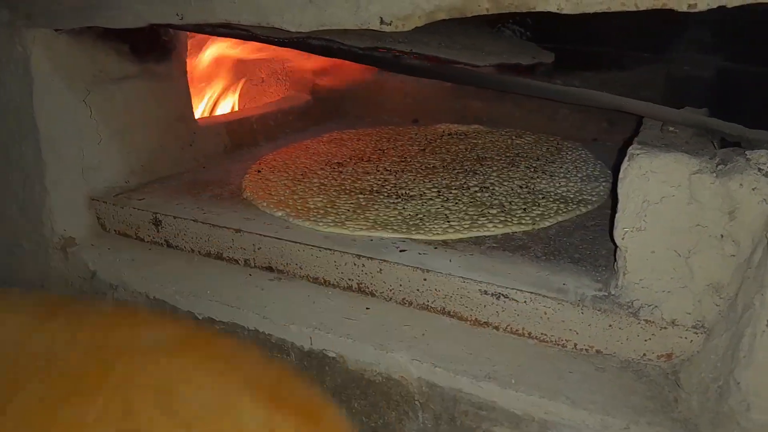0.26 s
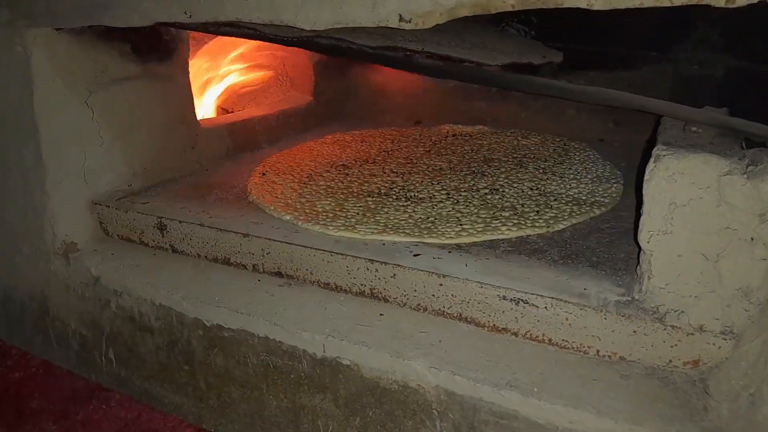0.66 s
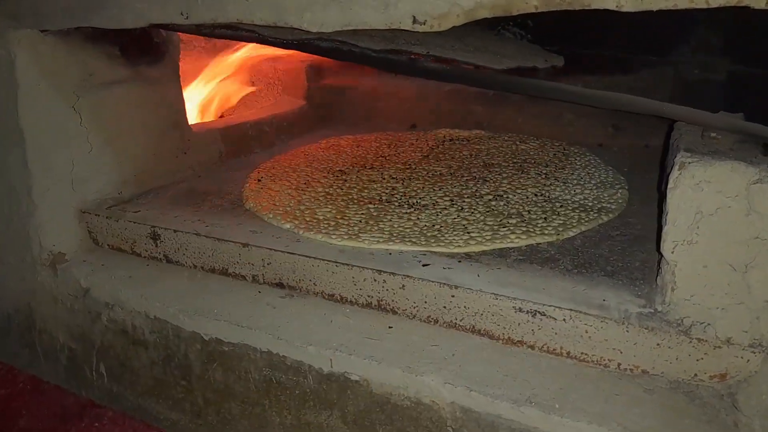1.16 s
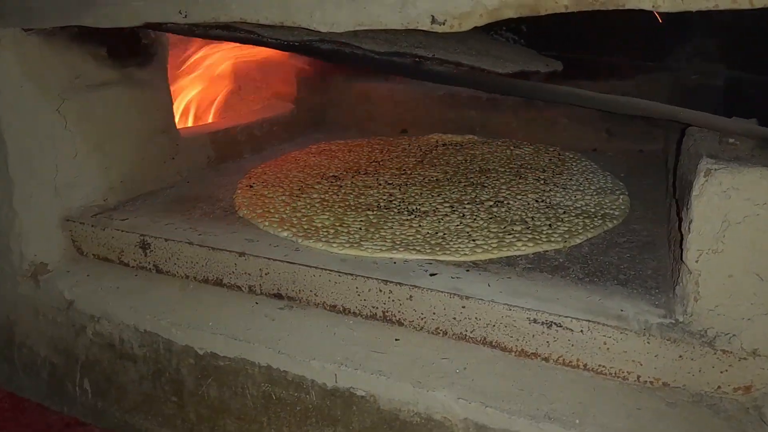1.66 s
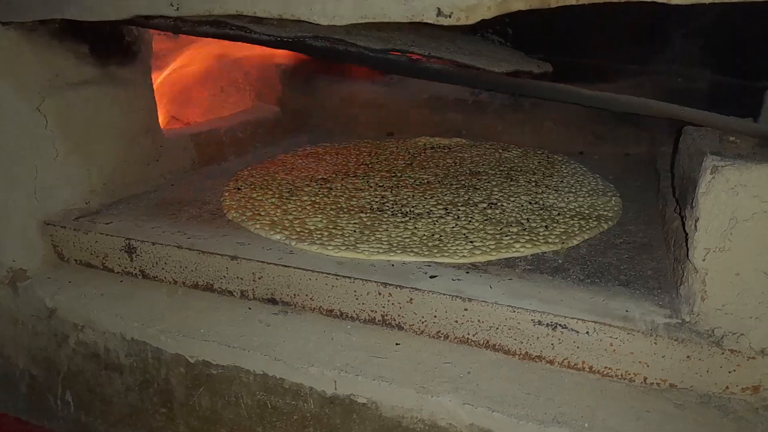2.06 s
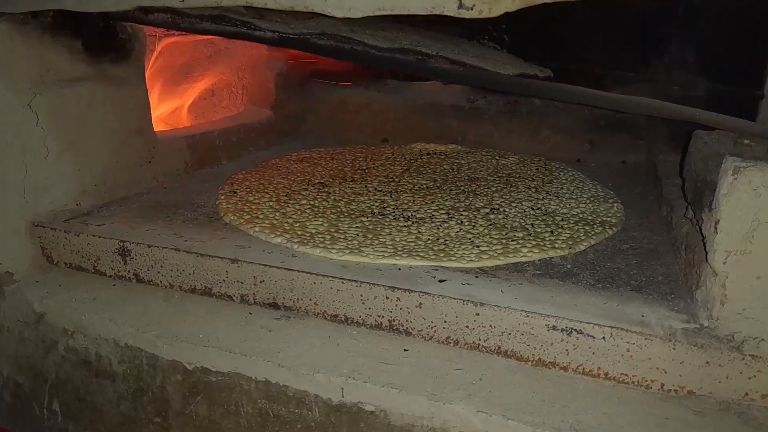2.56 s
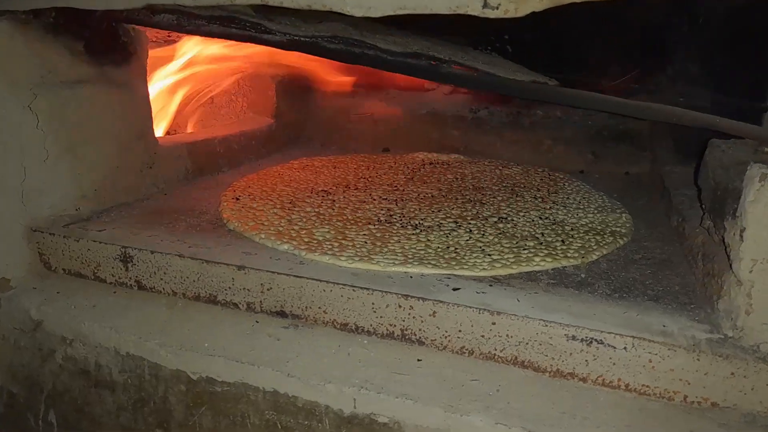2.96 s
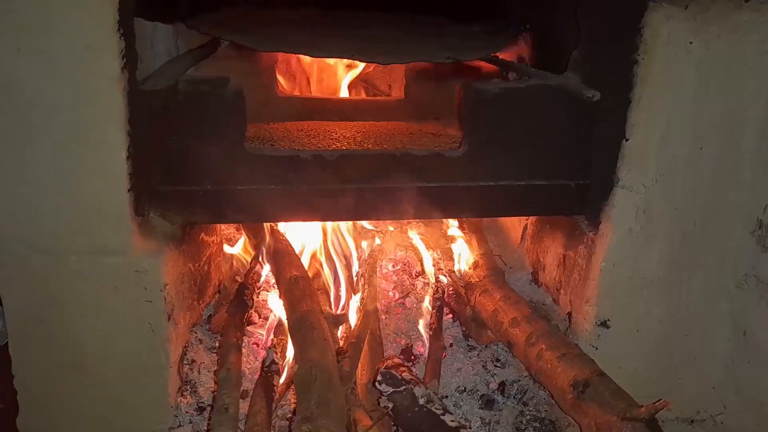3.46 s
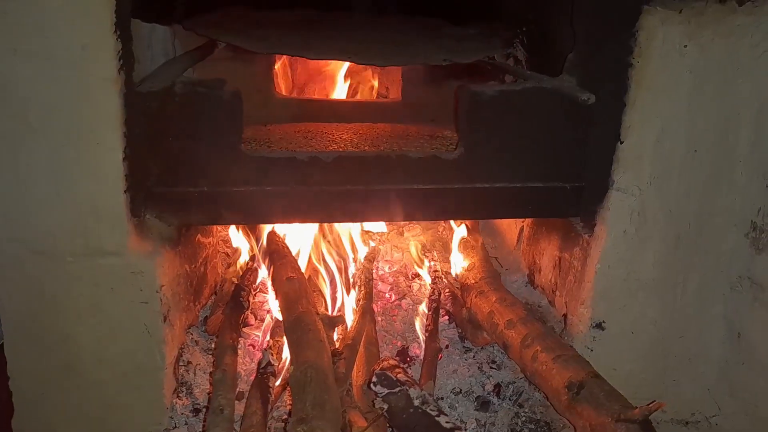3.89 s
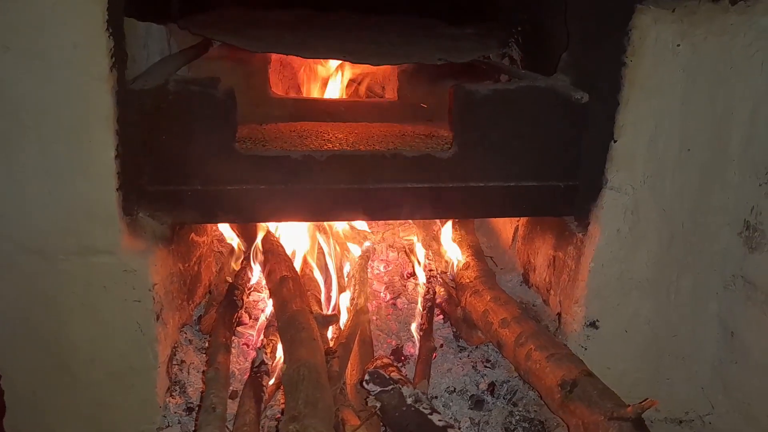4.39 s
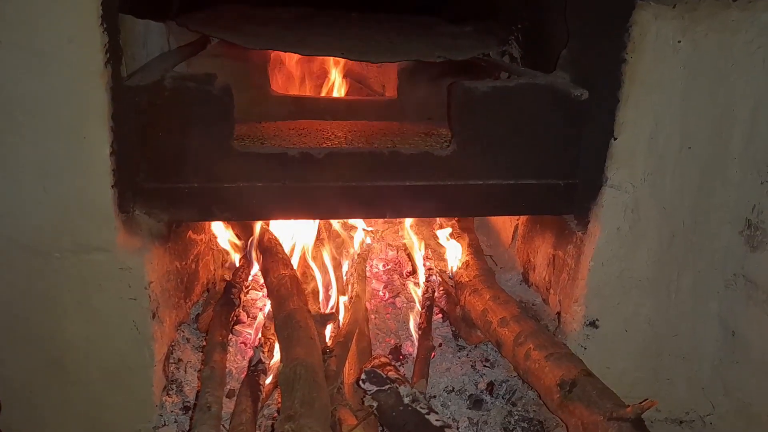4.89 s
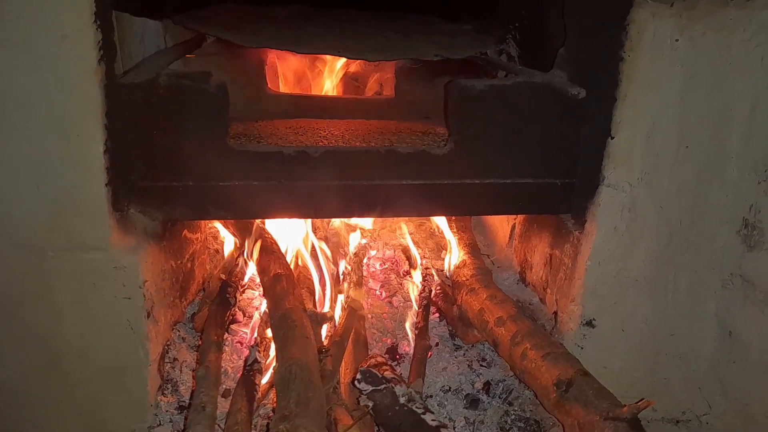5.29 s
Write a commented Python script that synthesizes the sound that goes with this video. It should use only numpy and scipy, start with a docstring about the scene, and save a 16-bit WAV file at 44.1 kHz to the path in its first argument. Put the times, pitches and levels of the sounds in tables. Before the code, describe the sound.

A wooden peel rasps briefly off a stone oven floor, knocks and bounces to rest, then a crackling wood fire comes closer.

```python
"""A rasping drag over stone is heard first: a wooden peel leaves an oven floor by stick-slip friction.
It is set down on its edge and its handle bounces to rest (decaying modes), amid scuffs, creaks and thuds.
Beneath, a wood fire hums, fizzes and spits (coloured noise and short bursts), with a low rumble of handling.
At 3.46 s the scene cuts to a nearer view of the fire: hum and fizz jump up, and a log knocks (decaying noise)."""
import sys
import numpy as np
from scipy import signal
from scipy.fft import rfft, irfft, next_fast_len
from scipy.io import wavfile
from scipy.ndimage import uniform_filter1d, map_coordinates

SR = 44100
rng = np.random.default_rng(int(sys.argv[2]) if len(sys.argv) > 2 else 0)


def dump(signal):
    """Clip the signal to [-1, 1] and save it as 16-bit WAV at the path in sys.argv[1]."""
    limited = np.clip(np.atleast_2d(signal).T, -1, 1)
    pcm = np.round(limited * 32767).astype(np.int16)
    wavfile.write(sys.argv[1], SR, pcm)


N = 244314

# The drag of the blade: time_s, rasp_level_db
PULL_LEVELS = [(0, -36.5), (.008, -26), (.024, -39), (.048, -32.5), (.072, -42.5), (.086, -34.5),
               (.106, -41.5), (.12, -56.5), (.22, -85.5)]
# Colour of the blade rasping on the oven floor: frequency_hz, level_db (relative, per Hz)
STONE_COLOUR = [(600, -35), (1600, -11), (2300, -4), (3200, -4.5), (4700, -3.5), (7000, -12),
                (12000, -28.5)]
# Colour of grit under wood: frequency_hz, level_db (relative, per Hz)
GRIT_COLOUR = [(2500, -22.5), (5000, -12), (6300, -11), (8000, -2), (10000, 3.5), (14000, -1), (16000, -2)]
# Resonances of the rubbed blade: centre_hz, width_hz, level_db
BLADE_MODES = [(312, 36, -11.5), (479, 19, 0.5), (677, 20, -2.5), (985, 33, -9), (1122, 40, -9.5),
               (1380, 50, -15), (1520, 41, -12), (2180, 150, -15)]
# Lowest bending modes of the blade: centre_hz, width_hz, level_db
BENDING_MODES = [(144.4, 22, -2.5), (201, 26, 0.2)]
# Shaking of the blade: start_level_db, dragged_fade_db_per_s, free_fade_db_per_s
BLADE_SWAY = (-24.5, 159, 415)
# Shaking of its lowest bending modes: start_level_db, dragged_fade_db_per_s, free_fade_db_per_s
BENDING_SWAY = (-22.5, 110, 288)
# Left-right likeness of a source close by: frequency_hz, left_right_correlation
NEAR_LIKENESS = [(100, 0.94), (600, 0.99), (2000, 0.2), (8000, 0.2)]
PULL_GRIT_DB = -9  # grit relative to the rasp


def pull():
    """Sliding friction: rough stone and grit radiate noise and excite the blade's modes."""
    rasp, = gains(PULL_LEVELS)
    grit_noise = rush(shape(GRIT_COLOUR), NEAR_LIKENESS, 1.7, 300, 0.00013)
    stone_noise = rush(shape(STONE_COLOUR), NEAR_LIKENESS, 2.3, 250, .00027)
    blade_noise = rush(ringing(BLADE_MODES), NEAR_LIKENESS, 2.4, 90, 0.00019)
    bending_noise = rush(ringing(BENDING_MODES), NEAR_LIKENESS, 2.8, 40)
    return (rasp * amp(PULL_GRIT_DB) * grit_noise * amp([[1.5], [-1.5]])
            + rasp * stone_noise * amp([[1.8], [-1.8]])
            + sway(*BLADE_SWAY) * blade_noise * amp([[-1.3], [1.3]])
            + sway(*BENDING_SWAY) * bending_noise)


LIFT_S = .112  # the blade leaves the stone


def sway(start_db, dragged, free):
    """Damped vibration: the level falls at one rate in contact, faster once the blade is free."""
    t = np.arange(N) / SR
    return amp(start_db - dragged * np.minimum(t, LIFT_S) - free * np.maximum(t - LIFT_S, 0))


# Catches of the blade on the stone: start_s, level_db (relative)
SLIP_EVENTS = [(0.005, -16), (0.011, -14), (0.035, -21), (0.045, -23), (0.057, -24), (0.087, -28.5),
               (0.122, -47)]


def slips():
    """Stick-slip: each catch releases a noise jolt that rings the blade and sprays grit."""
    jolts, t = np.zeros(N), np.arange(SR // 50) / SR
    for s, db in SLIP_EVENTS:
        jolts[round(s * SR):][:len(t)] += amp(db - 60 * t / .012) * rng.standard_normal(len(t))
    blade = amp(15.5) * filtered(jolts, ringing(BLADE_MODES))
    spray = amp(-5.0) * filtered(jolts, ringing([(4600, 2300, -5), (9800, 2000, -11)]))
    sound = blade + spray
    return np.array([sound, amp(-3) * np.roll(sound, 11)])  # later and weaker on the right


# The peel's edge touching down: start_s, level_db (relative)
SET_DOWN_BLOWS = [(.444, -50.5), (.729, -19), (.845, -49), (.918, -52)]
# Modes of the blade standing on its edge: pitch_hz, level_db, t60_s
EDGE_MODES = [(63, -9, 0.3), (105.4, -7, 0.2), (148.9, 5.5, 0.14), (203, -14.5, 0.21), (236.5, -12.5, 0.3),
              (327, -4, 0.076), (483, -9.5, 0.15), (606, -26.5, 0.13), (783, -27, 0.067)]
# The handle bouncing: start_s, level_db (relative)
BOUNCE_BLOWS = [(1.139, -23.5), (1.281, -28), (1.407, -30.5), (1.525, -42)]
# Modes of the handle: pitch_hz, level_db, t60_s
HANDLE_MODES = [(57.8, -22, 0.35), (153, -4, 0.33), (204.3, 4, 0.1), (240, -5, 0.13), (383, -11.5, 0.073),
                (513, -5.5, 0.042), (625, -9, 0.079), (700, -23.5, 0.12), (805, -14, 0.075)]
# Soft thuds: start_s, level_db (relative)
THUD_BLOWS = [(1.888, -43), (1.976, -53.5), (2.561, -52.5), (3.058, -47.5)]
# Modes of a soft, heavy contact: pitch_hz, level_db, t60_s
THUD_MODES = [(72.2, -4, 0.33), (111.5, 5.5, 0.14), (149.4, 0.5, 0.48)]


def peel_blows():
    """Impact excitation: edge, handle and soft contacts each ring their own modes."""
    return (knocks(SET_DOWN_BLOWS, EDGE_MODES, 0.0097, -1.2, .028, -8.0)
            + knocks(BOUNCE_BLOWS, HANDLE_MODES, 0.0046, -3.6, .023, -11.0)
            + knocks(THUD_BLOWS, THUD_MODES, 0.0038, -0.32, 0.0304, -5))


def knocks(events, modes, attack_s, trim_db, rebound_s, rebound_db):
    """Modal superposition: a soft blow rings decaying sines, and the body touches once more as it rocks."""
    out, t = np.zeros(N + SR), np.arange(SR // 2) / SR
    for s, db in events:
        for late, loss_db in (0, 0), (rebound_s, rebound_db):
            ring = 0
            for hz, level, t60 in modes:
                mode_db = level + rng.normal(0, 0.87)  # each blow excites the modes unevenly
                ring = ring + amp(mode_db - 60 * t / t60) * np.sin(2 * np.pi * hz * t)
            attack = 1 - np.exp(-t / attack_s)
            out[round((s + late) * SR):][:len(t)] += amp(db + trim_db + loss_db) * ring * attack
    return out[:N]


# Scuffs nearby: start_s (of full strength), rise_s, hold_s, fall_s, rasp_level_db (relative),
# grit_over_rasp_db, wood_over_rasp_db
SCUFF_STROKES = [(0.464, 0.21, 0.061, 0.6, -72.5, 5.5, -6.5), (.737, 0.036, 0.18, 0.1, -65, -0.5, 3),
                 (0.952, 0.0077, 0.0075, 0.077, -72.5, 19.5, -30),
                 (1.034, 0.16, 0.027, 0.045, -58.5, 1.5, 0.5), (1.083, 0.014, 0.015, 0.13, -52, 1, 0.5),
                 (1.373, 0.24, 0.035, 0.16, -73.5, 12, -14.5), (1.478, .006, 0.0056, 0.062, -59.5, 0, 4),
                 (1.584, 0.19, 0.011, 0.26, -63, 5.5, -13), (1.681, .006, .01, 0.21, -73, 14.5, -0.5),
                 (1.816, 0.0044, 0.0045, 0.028, -61.5, 12.5, 10.5),
                 (1.851, 0.034, 0.038, 0.09, -46, 2, 3.5), (1.998, 0.015, 0.011, 0.36, -80.5, 14, -20),
                 (2.207, .05, 0.0093, .05, -81.5, 15.5, -2), (2.397, 0.3, .03, 0.27, -78, 7.5, -9.5),
                 (2.553, 0.083, 0.011, 0.34, -69.5, 3.5, -13.5), (2.753, 0.037, 0.033, 0.2, -71, 6, -10.5),
                 (2.997, 0.13, 0.014, 0.067, -76, 16.5, -21.5),
                 (3.076, 0.094, 0.089, 0.042, -63.5, 0, -11.5), (3.162, .005, 0.007, 0.078, -55, -13, 3.5),
                 (3.189, .03, .01, 0.093, -67.5, -11, 8), (3.296, 0.21, 0.15, .1, -76, 8, -16.5)]
# Short hollow tones: centre_s, length_s, pitch_hz, level_db (relative)
CREAK_TONES = [(0.474, 0.044, 493, -79), (0.542, 0.062, 600, -66), (0.856, 0.071, 480.5, -57),
               (1.665, 0.018, 880, -63.5), (1.857, 0.062, 918, -48.5), (2.403, 0.052, 2676, -79.5),
               (2.538, 0.027, 2580, -74), (3.117, 0.12, 1389, -74)]
# Colour of the scuffs' rasp: frequency_hz, level_db (relative, per Hz)
RASP_COLOUR = [(600, -27), (1300, -14.5), (2000, -2), (3200, -3), (4700, -3.5), (6500, -5), (12000, -34)]
# Colour of the scuffs' wood: frequency_hz, level_db (relative, per Hz)
WOOD_COLOUR = [(150, -10), (400, -6), (650, -8), (950, -7.5), (1300, -11.5), (1950, -13.5), (2800, -30)]
SCUFF_FADE_DB = 26  # how far a scuff is down one rise before and one fall after
SCUFF_PAN_DB = -5  # left over right


def scuffs():
    """Rubbing friction: wood brushes over stone and ash to the right, creaking as short tones."""
    t = np.arange(N) / SR
    rasp, grit, wood, creaks = 0, 0, 0, 0
    for s, rise, hold, fall, db, grit_db, wood_db in SCUFF_STROKES:
        away = np.maximum(np.maximum((s - t) / rise, (t - s - hold) / fall), 0)
        stroke = amp(db - SCUFF_FADE_DB * away)
        rasp = rasp + stroke
        grit = grit + amp(grit_db) * stroke
        wood = wood + amp(wood_db) * stroke
    waver = 0.00013 * wobble(70)  # seconds, unsteadies the pitch
    for s, length, hz, db in CREAK_TONES:
        swell = np.exp(-8 * ((t - s) / length) ** 2)
        creaks = creaks + amp(db) * swell * np.sin(2 * np.pi * hz * (t + waver))
    pan = amp(np.array([[.5], [-.5]]) * SCUFF_PAN_DB)
    return pan * (grit * rush(shape(GRIT_COLOUR), NEAR_LIKENESS, 1.1, 550, -.0003)
                  + rasp * rush(shape(RASP_COLOUR), NEAR_LIKENESS, 1.5, 300, -.0003)
                  + wood * rush(shape(WOOD_COLOUR), NEAR_LIKENESS, 2.64, 120, -0.0003)
                  + creaks * amp(2.1 * wobble(71)))


# A log knocks and settles: start_s, level_db (relative)
LOG_KNOCKS = [(3.786, -27), (3.809, -40.5)]
# Colour of the knock: frequency_hz, level_db (relative, per Hz)
LOG_COLOUR = [(100, -5.5), (150, 6), (390, -21.5), (480, -1), (560, 3), (650, -2), (800, 4.5), (1070, 1.5),
              (1350, 2), (1500, -23.5), (2100, -2), (3000, -11.5), (3300, -27.5), (5500, -32), (8000, -43)]
# Decay of the knock: frequency_hz, t60_s
LOG_DECAY_TIMES = [(200, 0.24), (800, .2), (2500, 0.15), (6000, 0.27)]


def log():
    """Scattering: a dry knock becomes wall-diffused noise whose decay time depends on frequency."""
    out, length = np.zeros((2, N + SR)), SR // 2
    for s, db in LOG_KNOCKS:
        noise = rng.standard_normal(length) + .5 * rng.standard_normal((2, length))
        hz, t, z = signal.stft(noise, SR, nperseg=256)
        z = z * amp(along(LOG_COLOUR, hz)[:, None] - 60 * t / along(LOG_DECAY_TIMES, hz)[:, None])
        tail = signal.istft(z, SR, nperseg=256)[1][:, :length]
        tail[0] = np.roll(tail[0], 11)  # later on the left
        out[:, round(s * SR):][:, :length] += amp(db - 8.5) * tail / np.std(tail[:, :600])
    return out[:, :N] * amp([[-1.5], [1.5]])


# Loud cracks of sap and grit: start_s, level_db (relative), pitch_hz (of the band), left_over_right_db
LOUD_SPITS = [(0.2304, -52.5, 11400, -6), (0.3296, -50, 13600, -6), (0.374, -49.5, 13000, -3.5),
              (0.4504, -51.5, 12400, -5.5), (0.6649, -46.5, 12600, -13.5), (0.8759, -43, 14260, 2.0),
              (0.9569, -42, 9930, 3.5), (1.0804, -43, 4330, -2), (1.254, -51, 11200, -6.5),
              (1.476, -42.5, 10050, -18), (1.6871, -41, 10000, -10), (1.8123, -42.5, 6100, -17),
              (1.8424, -42, 14000, -5), (1.8507, -32.5, 10900, -7.5), (1.8602, -29, 13600, -4),
              (1.8674, -32.5, 10400, -5), (1.8784, -36, 6100, -4.5), (1.9144, -34.5, 9600, -4.5),
              (1.9994, -46.5, 11600, -10), (2.1994, -54.5, 7770, -6.0), (2.36, -55, 9230, -4.5),
              (2.4017, -56.5, 9330, -0.5), (2.4843, -45.5, 13700, 3), (2.5551, -46.5, 12800, 0.5),
              (2.7741, -48, 11500, -0.5), (2.7854, -43, 13200, 2.5), (2.7965, -37, 12900, 5.5),
              (2.9442, -49, 10200, -12.5), (3.1612, -43, 9900, -8), (3.4346, -45, 11000, -3),
              (3.5174, -43.5, 12300, 6.5), (3.5528, -47, 12900, 1.5), (3.5828, -40.5, 14000, 7.5),
              (4.1629, -39.5, 11400, 5), (4.2517, -43, 13800, 1), (4.3166, -36, 9630, 11),
              (4.369, -48, 12400, 5), (4.5521, -44, 6520, 11), (4.6423, -43.5, 9880, 11),
              (4.783, -40.5, 11300, 10), (4.8574, -37.5, 13900, 11), (4.9247, -37, 13300, 6),
              (5.0988, -41, 13800, 10), (5.1133, -41, 12260, 10), (5.1721, -42.5, 13400, 3.5),
              (5.3507, -44, 12400, 3.0), (5.3986, -45, 12300, 6), (5.4974, -39, 12200, 13)]
TICK_DB = -10.5  # gain of the broad click under each spit


def spits():
    """Impulsive release: sap and grit burst in a bright crack, a wall echo and a puff of steam."""
    out, t = np.zeros((2, N + SR)), np.arange(SR // 10) / SR
    crack = amp(-60 * t / .008)
    echo = np.roll(crack, round(.007 * SR))
    envelope = crack + amp(-11.0) * echo + amp(-14.5 - 60 * t / 0.05)
    for s, db, hz, pan_db in [*LOUD_SPITS, *small_spits()]:
        band = [hz / 1.45, min(hz * 1.25, 15200)]
        sos = signal.butter(2, band, "bandpass", fs=SR, output="sos")
        noise = rng.standard_normal(len(t)) + 0.23 * rng.standard_normal((2, len(t)))
        burst = signal.sosfilt(sos, noise * envelope)
        tick = np.diff(rng.standard_normal(len(t)) * crack ** 2, 2, prepend=[0, 0])
        burst = burst + amp(TICK_DB) * tick
        strength = np.sqrt(2) * np.std(burst.mean(0)[:SR // 500]) * 2  # from the first 2 ms
        pan = np.array([[.5], [-.5]]) * pan_db
        out[:, round(s * SR):][:, :len(t)] += amp(db + pan) * burst / strength
    return out[:, :N]


# The fire, jumping up at the cut to a nearer view: time_s, low_rumble_level_db (flames' hum, with rumble
# of handling from about 0.8 to 1.9 s), fizz_level_db (both relative)
FIRE_LEVELS = [(0, -53.5, -65), (.25, -64.5, -65.5), (.7, -69.5, -72), (.9, -58, -63), (1.37, -57.5, -73.5),
               (1.6, -59.5, -72.5), (1.84, -63, -69.5), (2.02, -65.5, -74.5), (2.82, -68.5, -74.5),
               (2.999, -69, -70.5), (3.456, -65.5, -76.5), (3.47, -60, -61), (4.65, -60, -61.5),
               (5.0, -56.5, -62), (5.55, -57, -61.5)]
SMALL_SPITS = 30
SMALL_DB, SMALL_SPREAD_DB, SMALL_HZ = 8, 2, 11500  # over the fizz, scatter, middle pitch


def small_spits():
    """Random point process: faint spits at chance moments, their level following the fizz."""
    s, _, fizz_db = np.transpose(FIRE_LEVELS)
    when, draw = rng.uniform(0, N / SR, SMALL_SPITS), rng.standard_normal((SMALL_SPITS, 3))
    db = np.interp(when, s, fizz_db) + SMALL_DB + SMALL_SPREAD_DB * draw[:, 0]
    hz = np.clip(SMALL_HZ * np.exp(.2 * draw[:, 1]), 5000, 14500)
    return np.transpose([when, db, hz, 6 * draw[:, 2]])


# Colour of the low rumble: frequency_hz, level_db (relative, per Hz)
RUMBLE_COLOUR = [(15, -40.5), (25, -17.5), (60, -1.5), (82, -8), (142, 0.5), (225, -14), (300, -13),
                 (417, -32), (505, -28), (624, -37), (1050, -39), (2500, -51), (3250, -80.5), (5500, -120)]
# Colour of the fizzing sap: frequency_hz, level_db (relative, per Hz)
FIZZ_COLOUR = [(2500, -44), (7000, -9.5), (8300, -17.5), (9800, -1), (13900, -2), (15800, -11.5)]
# Colour of the hiss: frequency_hz, level_db (relative, per Hz)
HISS_COLOUR = [(800, -13.5), (2300, -13.5), (4000, -6.5), (6000, 0.5), (7200, -6), (8500, -15),
               (12000, -33.5)]
# Likeness of diffuse sound: frequency_hz, left_right_correlation
DIFFUSE_LIKENESS = [(60, 1), (130, 0.91), (290, 0.28), (640, 0.25), (1400, 0.033), (6000, 0.013)]
HISS_DB = -8.5  # gain of the hiss against the fizz table


def fire():
    """Turbulent noise: flames hum low, joined by rumble of handling, and sap fizzes in fine crackle."""
    rumble, fizz = gains(FIRE_LEVELS)
    flicker = wobble(3.5)
    rumble_noise = rush(shape(RUMBLE_COLOUR), DIFFUSE_LIKENESS, 1.1, 40, patchy_db=0.9)
    fizz_noise = rush(shape(FIZZ_COLOUR), DIFFUSE_LIKENESS, 1.8, 510, patchy_db=0.7)
    hiss_noise = rush(shape(HISS_COLOUR), DIFFUSE_LIKENESS, .8, 400, patchy_db=0.36)
    return (rumble * amp(2.0 + 0.77 * wobble(3.8)) * rumble_noise * amp([[-.8], [.8]])
            + fizz * amp(1.5 + 0.31 * flicker) * fizz_noise
            + fizz * amp(HISS_DB + 0.16 * flicker) * hiss_noise)


ROOM_DB = -13


def room(x):
    """Reverberation: convolution with exponentially decaying noise gives the walls' short answer."""
    t = np.arange(SR // 3) / SR
    tail = rng.standard_normal((2, len(t))) * amp(-60 * t / 0.17)
    return signal.fftconvolve(x[None], tail / np.linalg.norm(tail[0]), axes=1)[:, :N]


def rush(colour, alike, grain_db, rate, lead_s=0., patchy_db=2.24):
    """Partly coherent stereo noise: rms 1, patchy and grainy; the left port hears it lead_s early."""
    z = signal.stft(rng.standard_normal((2, N)), nperseg=256)[2]
    field = uniform_filter1d(uniform_filter1d(rng.standard_normal(z.shape[1:]), 9, 0), 12, 1)
    patchy = signal.istft(z * amp(patchy_db * unit(field)), nperseg=256)[1][:, :N]
    common, opposed = patchy * amp(grain_db * wobble(rate))

    def angle(hz):
        return np.arccos(np.clip(along(alike, hz), -1, 1)) / 2  # sets the left-right correlation

    def port(sign):
        def arrival(hz):
            return colour(hz) * np.exp(sign * 1j * np.pi * hz * lead_s)
        return (filtered(common, lambda hz: arrival(hz) * np.cos(angle(hz)))
                + sign * filtered(opposed, lambda hz: arrival(hz) * np.sin(angle(hz))))
    return unit(np.array([port(1), port(-1)]))


def ringing(modes):
    """Resonance: the response of a sum of damped modes with alternating sign."""
    def response(f):
        total = 0
        for k, (c, w, db) in enumerate(modes):
            total = total + (-1) ** k * amp(db) * 1j * f * w / (c * c - f * f + 1j * f * w)
        return total
    return response


def shape(points):
    """Spectral colouring: gain against frequency from (Hz, dB) points."""
    return lambda hz: amp(along(points, hz))


def filtered(x, response):
    """Linear filtering: the spectrum of x times a complex response of frequency."""
    m = next_fast_len(N + SR // 2)
    return irfft(rfft(x, m) * response(np.fft.rfftfreq(m, 1 / SR)), m)[..., :N]


def wobble(rate):
    """Random modulation, slow or fast: a smooth curve through rate knots a second."""
    knots = rng.standard_normal(int(N * rate / SR) + 4)
    return map_coordinates(knots, [np.arange(N) * rate / SR])


def gains(rows):
    """Level envelopes: one gain per sample for each dB column, silent outside the table."""
    s, *cols = np.transpose(rows)
    return amp([np.interp(np.arange(N) / SR, s, c, -np.inf, -np.inf) for c in cols])


def along(points, hz):
    """Logarithmic frequency scale: (Hz, value) points interpolated on it."""
    f, v = np.transpose(points)
    return np.interp(np.log(hz + 1), np.log(f + 1), v)


def amp(db):
    """Decibel law: level to amplitude ratio."""
    return 10 ** (np.asarray(db) / 20)


def unit(x):
    """Normalisation to an rms of 1."""
    return x / np.sqrt(np.mean(x ** 2) + 1e-20)


def scene():
    """Superposition: the peel, its room sound, the log and the fire add linearly."""
    blows = peel_blows()
    peel = blows * amp([[-.6], [.6]]) + amp(ROOM_DB) * room(blows) + pull() + slips() + scuffs()
    return peel + log() + spits() + fire()


TOP_HZ = 15940  # band limit


def record(dry):
    """Band limitation: the microphone rolls off the deepest bass; nothing passes above TOP_HZ."""
    return filtered(dry, lambda hz: (hz < TOP_HZ) / (1 + (38 / (hz + 1)) ** 4))


dry = scene()
out = record(dry)
dump(out)
```